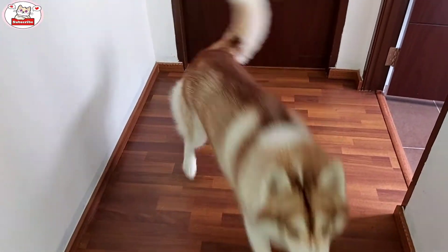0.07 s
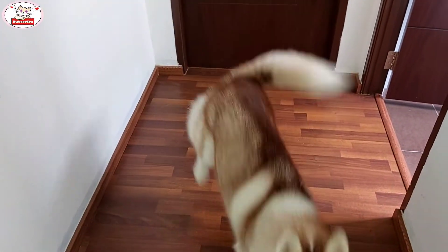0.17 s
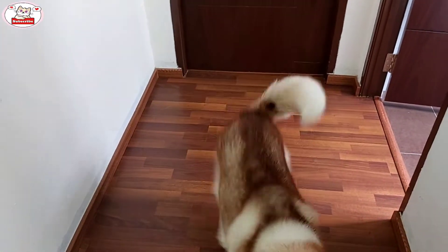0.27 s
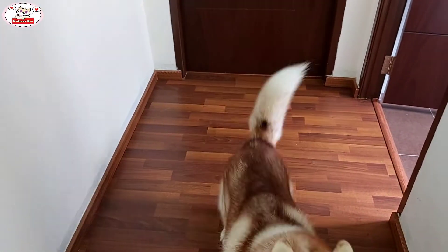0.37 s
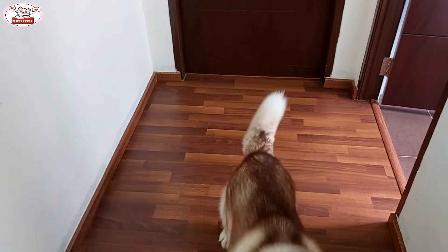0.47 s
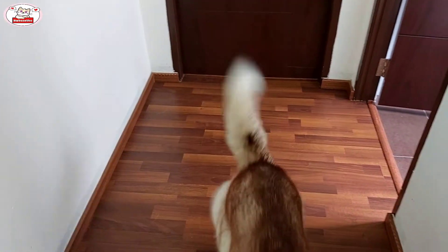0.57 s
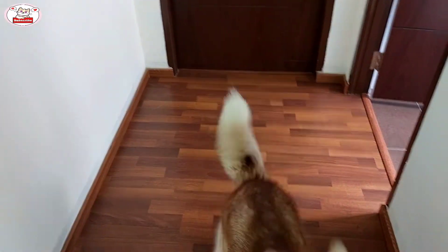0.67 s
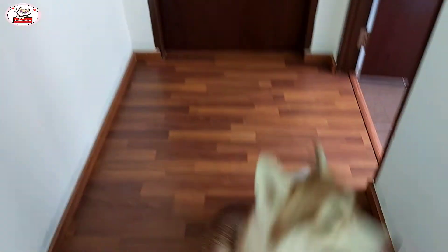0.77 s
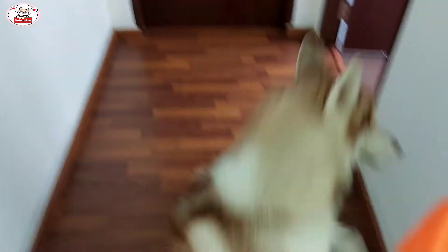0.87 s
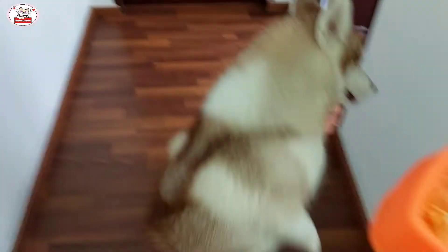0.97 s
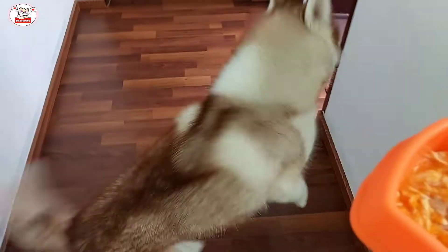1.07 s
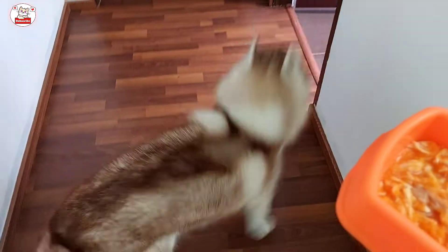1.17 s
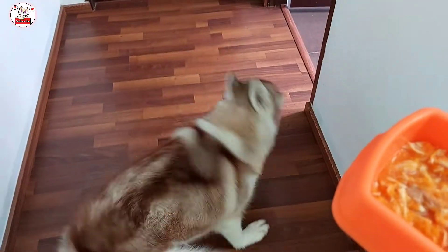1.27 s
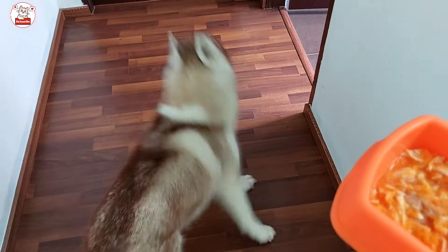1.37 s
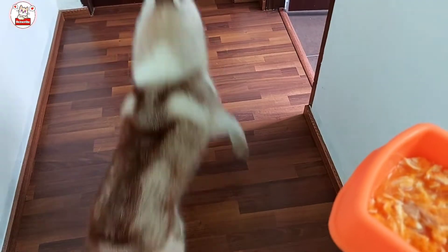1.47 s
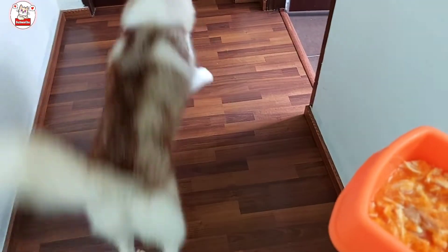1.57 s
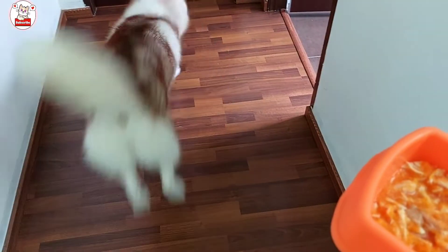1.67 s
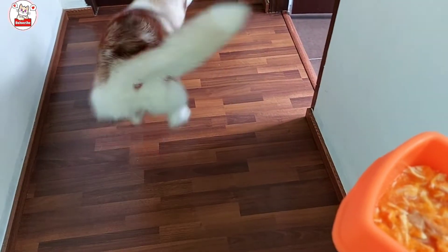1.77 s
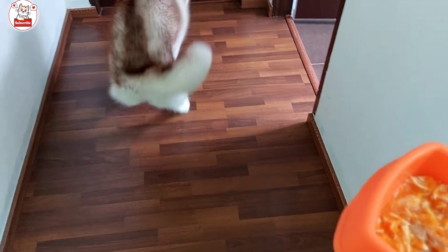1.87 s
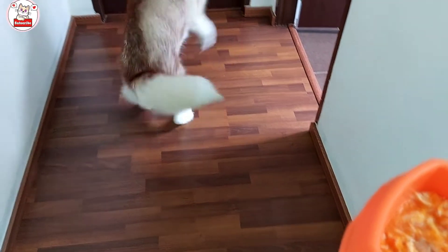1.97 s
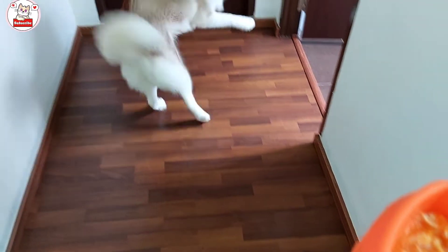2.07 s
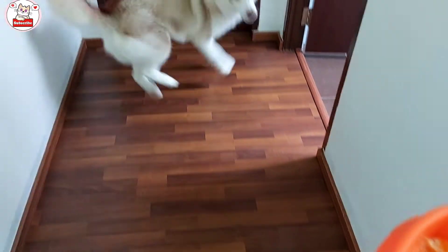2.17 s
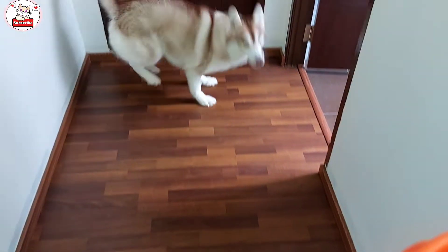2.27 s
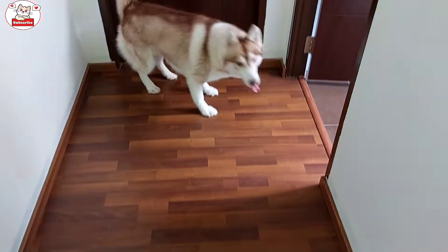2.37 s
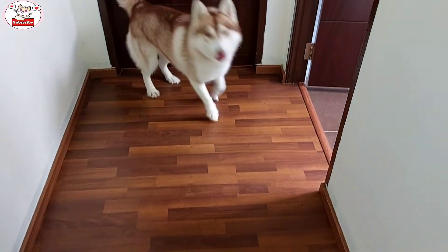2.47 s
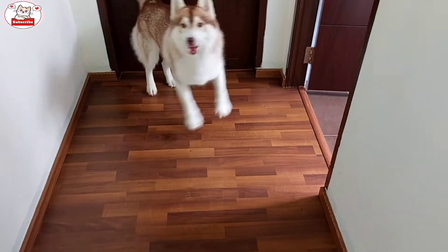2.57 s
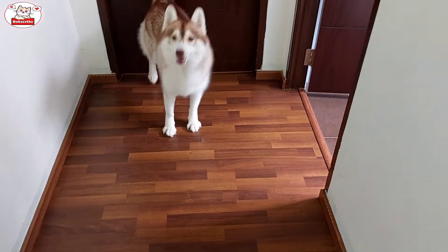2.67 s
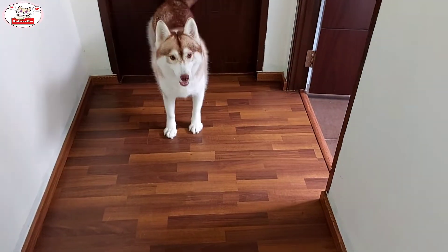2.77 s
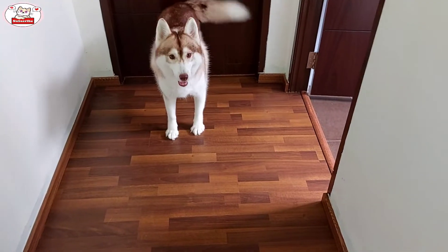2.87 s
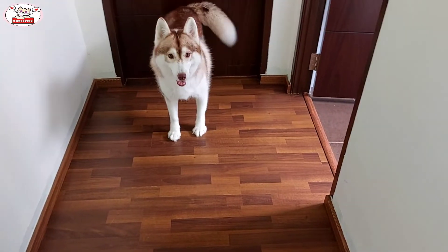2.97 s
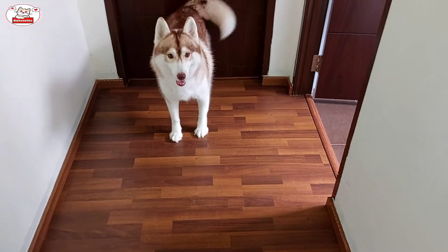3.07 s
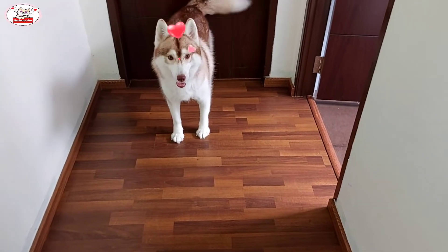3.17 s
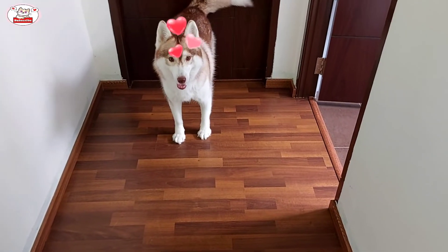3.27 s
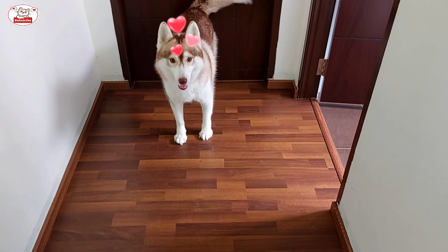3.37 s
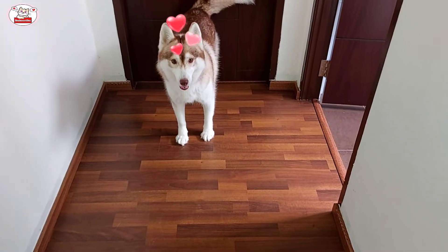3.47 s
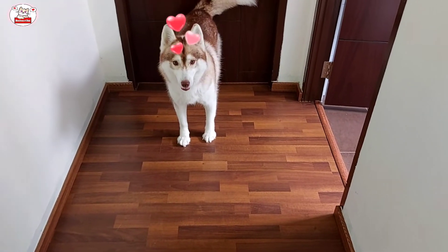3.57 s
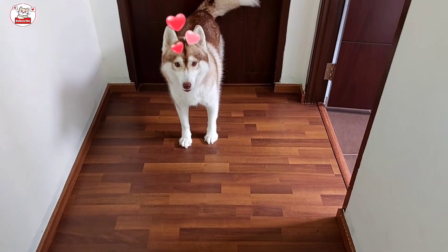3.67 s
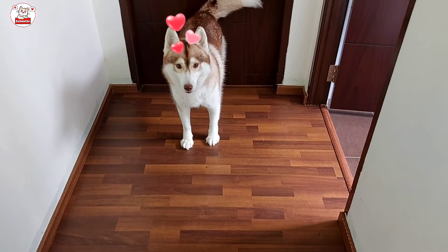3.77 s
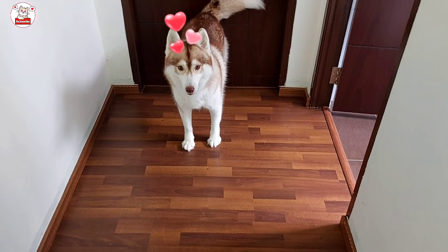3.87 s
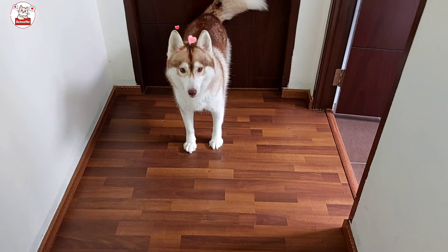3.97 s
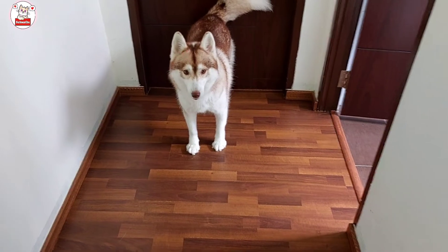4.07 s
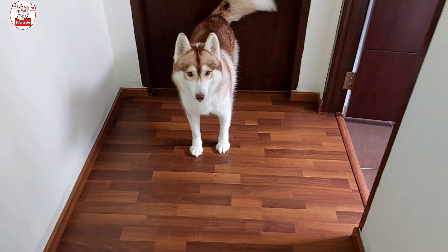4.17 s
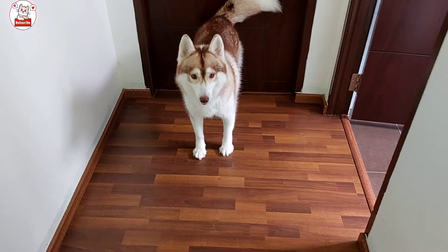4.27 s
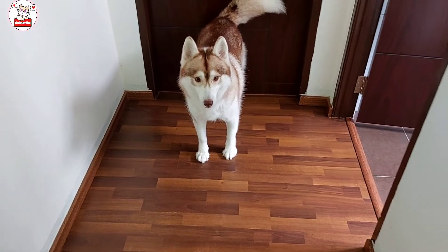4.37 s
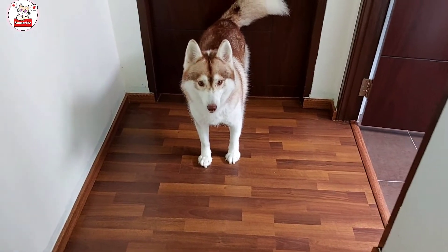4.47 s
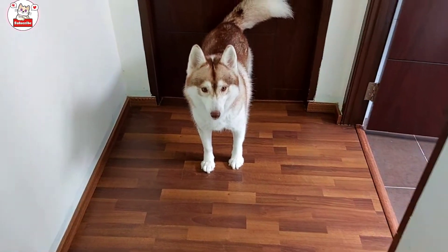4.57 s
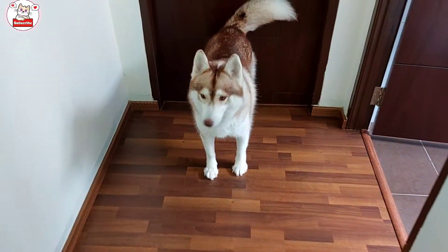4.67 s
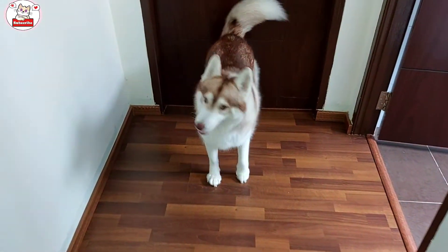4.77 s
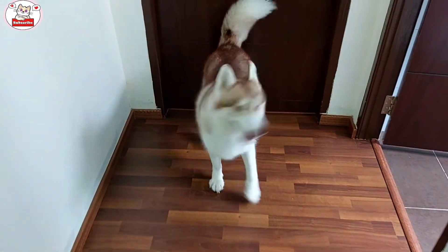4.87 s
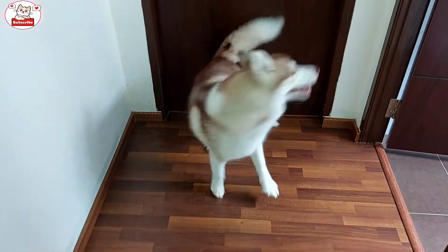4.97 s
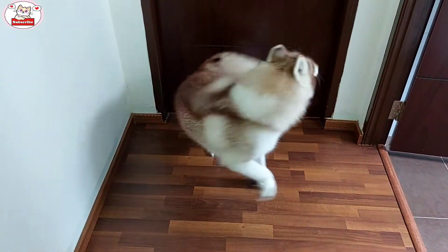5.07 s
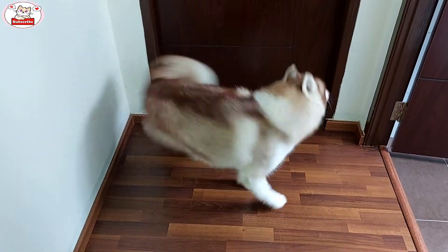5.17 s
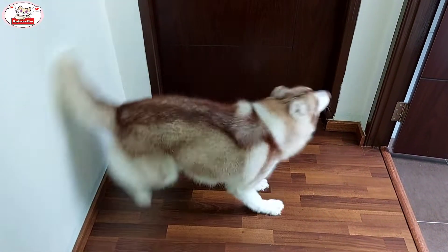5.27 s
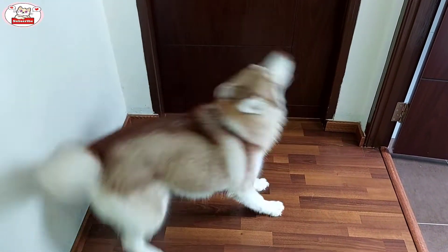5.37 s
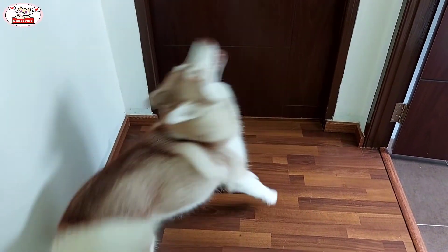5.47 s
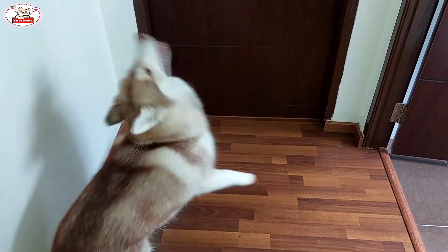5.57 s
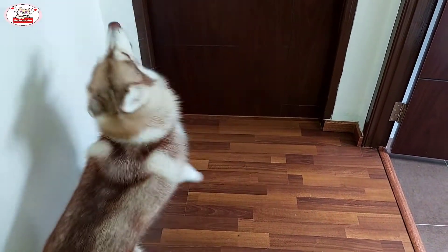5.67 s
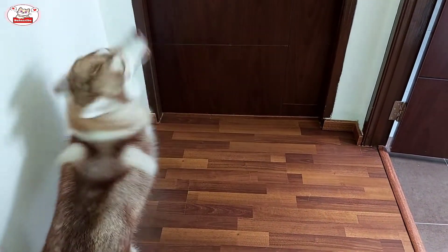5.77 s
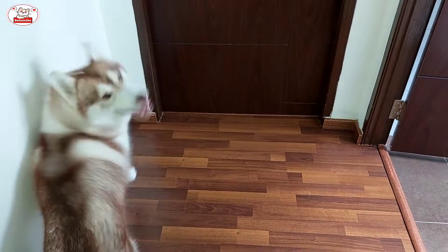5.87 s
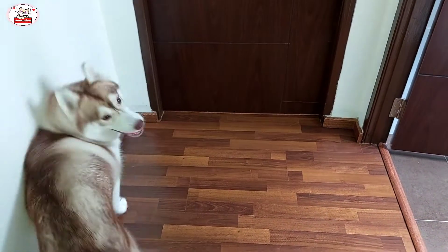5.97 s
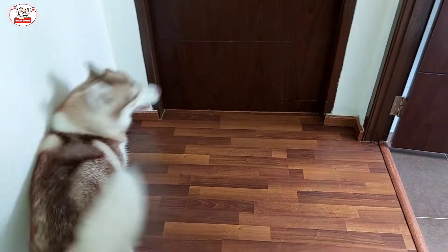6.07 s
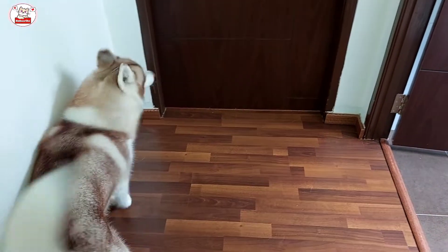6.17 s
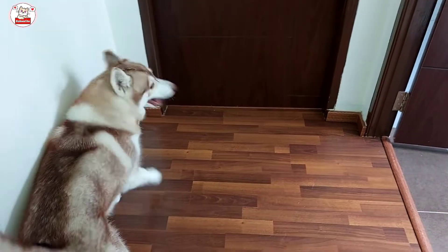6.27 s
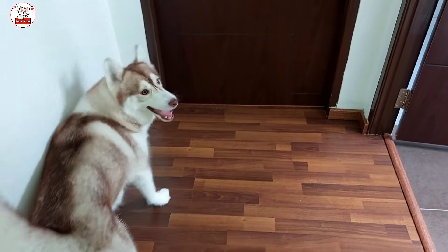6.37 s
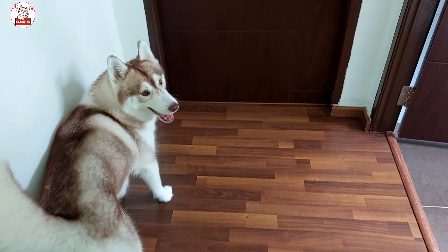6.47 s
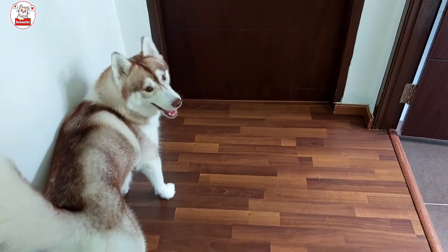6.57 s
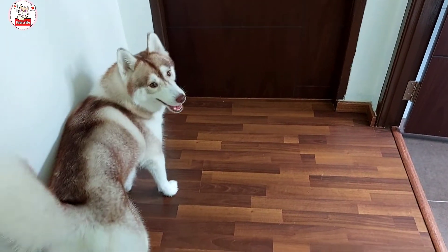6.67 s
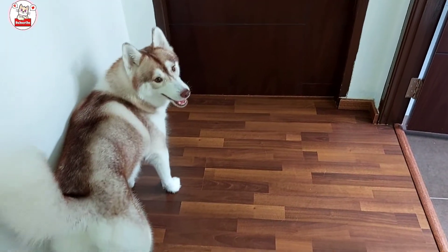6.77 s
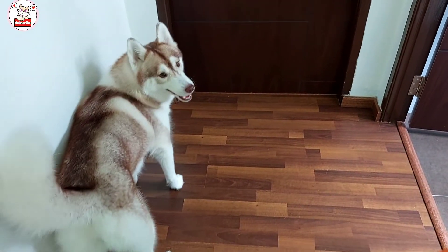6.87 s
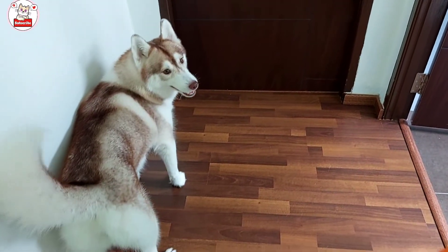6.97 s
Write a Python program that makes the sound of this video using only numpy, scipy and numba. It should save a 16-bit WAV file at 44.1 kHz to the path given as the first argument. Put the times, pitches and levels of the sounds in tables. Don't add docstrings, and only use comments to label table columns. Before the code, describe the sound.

A large dog romps on a laminate floor in a bare, echoing hallway, claws clattering and skidding, paws thumping, with short breathy huffs.

```python
import sys
import numpy as np
from scipy import signal
from scipy.fft import rfft, irfft
from scipy.io import wavfile
from scipy.ndimage import map_coordinates
from numba import njit

SR = 44100
rng = np.random.default_rng(int(sys.argv[2]) if len(sys.argv) > 2 else 0)


def dump(signal):
    limited = np.clip(np.atleast_2d(signal).T, -1, 1)
    pcm = np.round(limited * 32767).astype(np.int16)
    wavfile.write(sys.argv[1], SR, pcm)


def makeup_ratio(level_db):
    decades = np.asarray(level_db, float) / 20
    return 10 ** decades


N = 308700
STEADY_TOP_HZ = 15400


def nails(scrape):
    # t/s, peak level/dB, treble tilt/dB, scratch t60/s
    strikes = [(0.0234, -33.5, -21, 0.027), (0.1292, -12.5, -1, 0.033), (0.1434, -25, -19, 0.022),
               (0.3111, -20, 1.5, 0.058), (0.381, -26.5, 4.5, 0.03), (0.5209, -18.5, 0.5, 0.0083),
               (0.532, -9.5, -9.5, 0.0066), (0.668, -21.5, 7, 0.03), (0.712, 1, 1.5, 0.0074),
               (1.058, -29.5, -10.5, 0.059), (1.1999, -12, 6.5, 0.017), (1.2078, -3, 2, 0.015),
               (1.6823, -12.5, -7, 0.027), (1.7035, -21.5, 10, 0.027), (1.924, -17.5, 7.5, 0.03),
               (2.1588, -28, -1.5, 0.03), (2.2337, -16.5, -3.5, 0.04), (2.2458, -11.5, 8.5, 0.022),
               (2.6536, -14.5, 15.5, 0.01), (2.6716, -12.5, 6.5, 0.027), (2.7791, -27.5, -12.5, 0.025),
               (3.015, -27, -5.5, 0.026),
               (4.9286, -32, -18.5, 0.054), (5.0152, -23.5, -6, 0.034), (5.1115, -24.5, 7, 0.049),
                     (5.1732, -23.5, 0, 0.042), (5.2249, -17.5, 5.5, 0.042), (5.4073, -24.5, 4, 0.047),
                     (5.429, -17.5, 4.5, 0.047), (5.986, -20.5, 4, 0.041), (6.035, -24.5, -16, 0.022),
                     (6.0716, -11.5, 14.5, 0.02), (6.336, -12.5, 2.5, 0.021), (6.3494, -20, -3.5, 0.031)]
    # t/s, peak level/dB, scratch t60/s, rise/s
    skids = [
        (0.5312, -13.5, 0.085, 0.025),
        (0.7998, -13.5, 0.45, 0.11),
        (1.607, -31, 0.18, 0.009),
        (1.9114, -12.5, 0.058, 0.016),
        (2.04, -13.5, 0.2, 0.037),
        (2.24, -15, 0.12, 0.016),
        (4.765, -32.5, 0.17, 0.05),
        (5.2694, -27.5, 0.21, 0.013),
        (5.4894, -35, 0.06, 0.017),
    ]
    # f/Hz, density level/dB per Hz
    nail_colour = [(530, -46.5), (900, -7), (1870, -8), (3300, -6), (4870, -2), (6440, -7), (11700, -12),
                   (15600, -18), (16400, -49.5)]
    tick_rise_s, pan_db = 0.00093, -2.5
    touches = [(*row, tick_rise_s) for row in strikes]
    touches += [(s, db, 0, t60, rise) for s, db, t60, rise in skids]

    near, blows = np.zeros((2, N)), np.zeros((2, N))
    t = np.arange(6000) / SR
    noise = rng.standard_normal((len(touches), 2, len(t)))
    shelf = signal.butter(1, 4500, fs=SR)
    for (s, db, tilt_db, t60, rise), burst in zip(touches, noise):
        burst = burst * makeup_ratio(-60 * t / np.clip(t60, .003, .3))
        burst *= 1 - np.exp(-t / max(rise, 1e-4))
        blow = burst
        if rise <= .005:
            blow = np.sqrt(np.sum(burst ** 2)) * (t[None] == t[40])
        for out, sound in ((near, burst), (blows, blow)):
            dull = signal.lfilter(*shelf, sound)
            tilted = makeup_ratio(tilt_db / 2) * (sound - dull) + makeup_ratio(-tilt_db / 2) * dull
            add(out, s, makeup_ratio(db + 4.5) * tilted, pan_db * (out is near))

    slide = scrape * np.array([grains(2500, spread_db=0.5), grains(2100, spread_db=8.5)])
    slide = below_steady_top(slide)
    return coloured(near + slide, nail_colour), coloured(blows + slide, nail_colour)


def pads():
    # t/s, peak level/dB, board pitch f/Hz, body weight level/dB
    steps = [(0.128, -8.5, 403, -14), (0.161, -3, 554, -10.5), (0.171, -5, 568, -24),
             (0.189, -15, 597.5, -20.5), (0.264, -20, 497, -14), (0.309, -6, 495.6, -18.5),
             (0.399, -19.5, 480, -9), (0.519, -5.5, 581, -20.5), (0.58, -11, 385.5, -23.5),
             (0.657, -13.5, 554, -15), (0.719, -14.5, 590, -11.5), (0.965, -18.5, 583, -21),
             (1.201, -4.5, 462, -10.5), (1.242, -4, 521, -6), (1.26, -10, 443, -2),
             (1.297, -10.5, 545, -16), (1.333, -31.5, 500, -14), (1.498, -19, 274, -13),
             (1.683, -19, 310, -23), (1.732, -7, 334, -7.5), (1.76, -17.5, 364, -12), (1.919, -15, 574, -5),
             (1.968, -15, 630, -4), (2.06, -25.5, 582, -21.5), (2.238, -17.5, 375, -19),
             (2.252, -11, 570, -3.5), (2.419, -21, 390, -4), (2.503, -21.5, 383, -3),
             (2.654, -12, 647, -10), (2.681, -12, 488, -22.5)]
    # t/s, peak level/dB, board pitch f/Hz, body weight level/dB
    later_steps = [(3.019, -24, 292, -15), (3.304, -32.5, 367, -12), (3.468, -37, 263, -7.5),
                   (4.916, -17, 637, -9), (5.019, -20, 648, -12), (5.22, -19.5, 317, -12),
                   (5.405, -19.5, 240, -14), (5.435, -15.5, 603, -5), (5.63, -25.5, 270, -6),
                   (5.72, -19.5, 301, -13.5), (5.984, -17, 816, -16), (6.059, -19, 256, 0),
                   (6.335, -18.5, 326.4, -3), (6.351, -22, 247, -17.5)]
    # f/Hz, level/dB, t60/s
    shared_modes = [(78, -14, 0.15), (134.5, -14.5, 0.23), (263, -9, 0.15), (336, -0.5, 0.057),
                    (380, -1.5, 0.05), (464, 2, 0.051), (549, 8, 0.031), (600, 3.5, 0.025), (919, -18, 0.1)]
    deep_push_db, pan_db = -16.5, 2.3
    blows = [*steps, *later_steps]
    out, t = np.zeros((2, N)), np.arange(9000) / SR
    chance = rng.normal(0, 1, (len(blows), len(shared_modes)))
    for (s, db, board_hz, weight_db), luck in zip(blows, chance):
        thump = np.sin(2 * np.pi * board_hz * t) * makeup_ratio(-60 * t / 0.036)
        for (hz, level_db, t60), c in zip(shared_modes, luck):
            push_db = deep_push_db if hz < 100 else weight_db if hz < 290 else -9.0
            thump += np.sin(2 * np.pi * hz * t) * makeup_ratio(level_db + push_db + 0.63 * c - 60 * t / t60)
        add(out, s, makeup_ratio(db) * thump * (1 - np.exp(-t / 0.0062)), pan_db)
    return out


def shuffle(drag, rumble):
    boards = rms_one(band(band(grains(1500, spread_db=3.5), 362, 850), 300, 1050))
    shudder = rms_one(band(rng.standard_normal(N), 49, 200)) * makeup_ratio(2.6 * drift(6.1) - 7.5)
    return drag * boards + rumble * shudder


def huffs():
    # t/s, held/s, level/dB, mouth resonance at the start f/Hz, when the hold ends f/Hz
    breaths = [
        (0.97, .08, -51, 1630, 1796),
        (1.77, .12, -35.5, 943, 1500),
        (2.529, .125, -33, 1427, 1510),
        (3.13, .1, -47.5, 1538, 1580),
        (4.715, 0.16, -44.5, 1590, 1953),
        (4.9, 0.06, -44.5, 1807, 1790),
        (5.17, 0.062, -38, 1720, 1777),
        (5.575, 0.15, -35.5, 1660, 1960),
        (5.99, 0.17, -33, 1676, 1632),
        (6.38, .14, -42.5, 1787, 1630),
    ]
    throat_db, rasp_db = -6, 2
    t = np.arange(N) / SR
    start, held, _, from_hz, to_hz = np.transpose(breaths)
    corners_s = np.ravel([start, start + held], "F")
    mouth_hz = np.interp(t, corners_s, np.ravel([from_hz, to_hz], "F"))
    gate = swells(breaths, attack_s=0.04, fall_db_per_s=194)
    effort_db = 0.26 * (20 * np.log10(gate + 1e-9) + 38.5)
    left, right = (huff(mouth_hz, throat_db + effort_db, rasp_db + effort_db, gate) for port in range(2))
    return np.array([left + 0.057 * right, right + 0.081 * left])


def huff(mouth_hz, throat_db, rasp_db, gate):
    # f/Hz, width/Hz, level/dB
    upper_mouth = [(3400, 500, -16), (4500, 1500, -16), (8000, 4000, -22)]
    air = rng.standard_normal(N) * makeup_ratio(2.1 * drift(70.0))
    voice = rms_one(formant(formant(air, mouth_hz, 220), mouth_hz, 500))
    voice -= makeup_ratio(-9) * rms_one(formant(formant(air, 2700, 300), 2700, 600))
    voice -= makeup_ratio(throat_db) * rms_one(formant(formant(air, 670, 490), 810, 500))
    rasp = rms_one(band(grains(4000, spread_db=-1.5), 710, 2900))
    for k, (hz, width, db) in enumerate(upper_mouth):
        rasp += (-1) ** k * makeup_ratio(db) * rms_one(formant(air, hz, width))
    return gate * makeup_ratio(-8.0) * (voice + makeup_ratio(rasp_db - 3.5) * rasp)


def hallway(x, wet_db, count=4):
    # f/Hz, t60/s, echo level/dB
    decay = [(61, 0.8, -1.5), (267, 0.77, -1.5), (690, 0.58, 0), (1910, 0.81, 5), (4900, 0.67, 0.5),
             (9600, 0.41, 5), (14000, 0.5, -5)]
    t, out = np.arange(int(1.2 * SR)) / SR, 0
    for k in range(count):
        tail = diffuse(len(t), lambda hz: makeup_ratio(at_hz(decay, hz, order=2) - 60 * t / at_hz(decay, hz)))
        tail *= 1 - np.exp(-t / 0.0026)
        tail *= makeup_ratio(wet_db) / np.sqrt(np.sum(tail ** 2) / 2)
        place = np.sqrt(np.clip(1 - abs(np.linspace(0, count - 1, N) - k), 0, 1))
        out = out + signal.fftconvolve((place * x.mean(axis=0))[None], tail, axes=1)[:, :N]
    return out


def house():
    # f/Hz, rms level/dB
    hum_lines = [(53.8, -85.5), (129.2, -65.5), (263.8, -56.5), (398.4, -72.5), (463.0, -87), (576.0, -100),
                 (829.0, -81), (1050, -84)]
    # f/Hz, density level/dB per Hz
    room_tone = [(15, -54), (25, -30.5), (53, -10.5), (100, -31), (135, -4.5), (177, -18), (266, -11.5),
                 (339, -19), (1060, -37.5), (3320, -55), (6300, -55.5), (10800, -52.5), (15300, -57),
                 (16500, -85.5)]
    room_db = -54
    t, hum = np.arange(N) / SR, 0
    for hz, db in hum_lines:
        level = makeup_ratio(db + 3 + 1.5 * drift(6.0))
        hum = hum + level * np.sin(2 * np.pi * hz * t + .35 * drift(4.0))
    room = rms_one(diffuse(N, lambda hz: makeup_ratio(at_hz(room_tone, hz))))
    return hum * makeup_ratio([[.4], [-.4]]) + makeup_ratio(room_db - 1.5) * room


def diffuse(size, gain):
    # f/Hz, coherence (-1 to 1)
    likeness = [(60, 0.64), (250, 0.82), (500, 0.45), (1000, 0.026), (4000, .05), (14000, 0.091)]
    edges = 25 * 2 ** np.arange(0, 9.6, .5)
    out, white = 0, rng.standard_normal((2, 2, size))
    for k, (low, high) in enumerate(zip(edges, edges[1:])):
        centre = np.sqrt(low * high)
        mid, side = band(white[k % 2], low, high)
        alike = np.clip(at_hz(likeness, centre), -1, 1)
        pair = np.sqrt(1 + alike) * mid + np.sqrt(1 - alike) * side * [[1], [-1]]
        out = out + gain(centre) * pair
    return below_steady_top(out)


def below_steady_top(x):
    return signal.sosfilt(signal.ellip(8, .5, 60, STEADY_TOP_HZ, fs=SR, output="sos"), x)


def swells(rows, attack_s, fall_db_per_s, order=2):
    power, t = np.zeros(N), np.arange(N) / SR
    for row in rows:
        age = (t - row[0])[t > row[0]][:SR]
        fall_db = fall_db_per_s * np.maximum(age - row[1], 0)
        gain = np.minimum(age / attack_s, 1) ** 2 * makeup_ratio(row[order] - fall_db)
        power[np.searchsorted(t, row[0], "right"):][:SR] += gain ** 2
    return np.sqrt(power)


def grains(per_s, spread_db):
    sizes = makeup_ratio(spread_db * np.minimum(rng.exponential(1, N), 4)) * rng.choice([-1, 1], N)
    return rms_one(sizes * (rng.random(N) < per_s / SR))


def drift(rate):
    steps = rng.standard_normal(int(N / SR * rate) + 3)
    return map_coordinates(steps, [np.arange(N) / SR * rate], order=3)


def coloured(x, spectrum):
    hz = np.maximum(np.fft.rfftfreq(2048, 1 / SR), 1)
    log_gain = np.log(makeup_ratio(at_hz(spectrum, hz)))
    cepstrum = irfft(log_gain) * np.r_[1, 2 * np.ones(1023), 1, np.zeros(1023)]
    return signal.fftconvolve(x, irfft(np.exp(rfft(cepstrum)))[None], axes=1)[:, :N]


@njit
def resonance(x, w, r):
    y = np.zeros(len(x))
    for i in range(2, len(x)):
        drive = (1 - r * r) / 2 * (x[i] - x[i - 2])
        y[i] = drive + 2 * r * np.cos(w[i]) * y[i - 1] - r * r * y[i - 2]
    return y


def formant(x, hz, width_hz):
    return resonance(x, 2 * np.pi * hz / SR * np.ones(len(x)), np.exp(-np.pi * width_hz / SR))


def band(x, low_hz, high_hz):
    return signal.sosfilt(signal.butter(2, [low_hz, high_hz], "band", fs=SR, output="sos"), x)


def at_hz(points, hz, order=1):
    points = np.array(points)
    return np.interp(np.log(hz), np.log(points[:, 0]), points[:, order])


def rms_one(x):
    return x / np.sqrt(np.mean(x ** 2) + 1e-20)


def add(out, s, sound, pan_db):
    i = round(s * SR)
    out[:, i:i + sound.shape[-1]] += (sound * makeup_ratio([[pan_db / 2], [-pan_db / 2]]))[:, :N - i]


def scene():
    # t/s, held/s, nail scrape level/dB, pad drag level/dB, floor rumble level/dB
    slides = [(-.06, 0.055, -42, -40, -56), (.12, 0.059, -34.5, -33, -44), (.27, 0.033, -33, -38, -34.5),
              (.515, 0.25, -26.5, -33.5, -35.5), (.79, 0.17, -38.5, -44, -52),
              (.96, 0.096, -36.5, -39, -49), (1.19, 0.27, -41, -47, -45), (1.67, 0.15, -35, -36, -49),
              (1.84, 0.19, -46, -42.5, -54), (2.23, 0.025, -41, -33.5, -28), (2.39, 0.18, -39, -52, -38),
              (2.58, 0.18, -39.5, -45.5, -48), (2.95, 0.3, -58, -56.5, -68), (4.78, .1, -44.5, -46, -50),
              (4.89, 0.098, -33.5, -39.5, -43), (5.08, 0.15, -46, -47.5, -40.5),
              (5.19, 0.07, -54, -42.5, -40.5), (5.39, 0.056, -57, -40, -58.5),
              (5.57, 0.12, -33.5, -39, -44), (5.76, 0.22, -54.5, -52, -49), (6.0, 0.13, -30, -37, -40.5),
              (6.25, 0.31, -53, -49.5, -48.5)]
    # f/Hz, width/Hz, level/dB
    flutter = [(1450, 7, 1), (1616, 5, 5.5), (1970, 7.6, 8)]
    scrape, drag, rumble = (swells(slides, attack_s=0.04, fall_db_per_s=147.5, order=k) for k in (2, 3, 4))
    ticks, blows = nails(scrape)
    thumps = pads() + shuffle(drag, rumble)
    breath = huffs()
    direct = makeup_ratio(4.0) * ticks + makeup_ratio(1.0) * thumps + makeup_ratio(7.0) * breath
    ringing = sum(makeup_ratio(db) * np.array([formant(port, hz, width) for port in breath]) for hz, width, db in flutter)
    to_walls = makeup_ratio(1.5) * blows + makeup_ratio(3.0) * thumps + makeup_ratio(0.5) * breath
    return direct + ringing + hallway(to_walls, wet_db=0.0, count=6) + house()


def roll_off(x):
    return signal.sosfilt(signal.butter(12, 16640, fs=SR, output="sos"), x)


def record(dry):
    # f/Hz, width/Hz, added level/dB
    port_peak = (4370, 1500, -16)
    low_cut_hz = 48
    heard = signal.sosfilt(signal.butter(2, low_cut_hz, "high", fs=SR, output="sos"), dry)
    hz, width, db = port_peak
    heard += makeup_ratio(db) * np.array([formant(port, hz, width) for port in heard])
    heard = .9 * np.tanh(heard / .9)
    return roll_off(heard)


dry = scene()
out = record(dry)
dump(out)
```